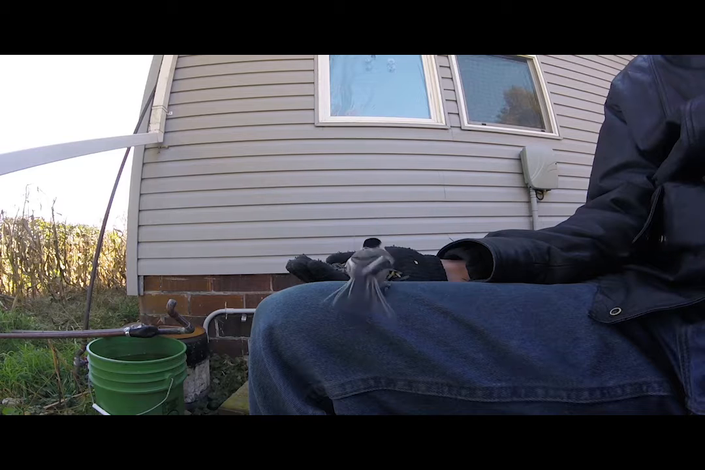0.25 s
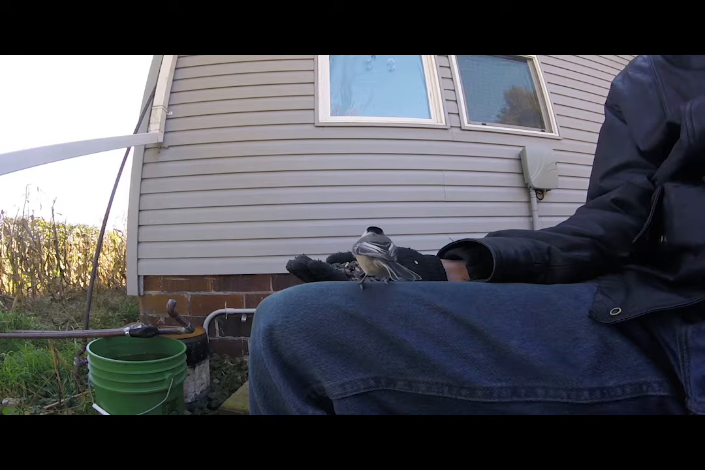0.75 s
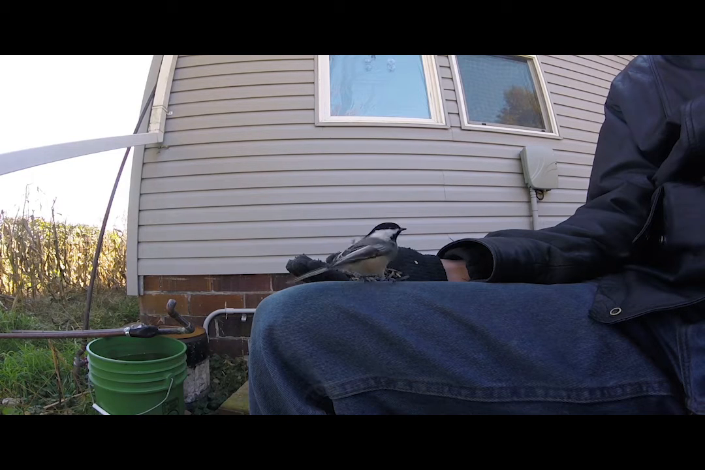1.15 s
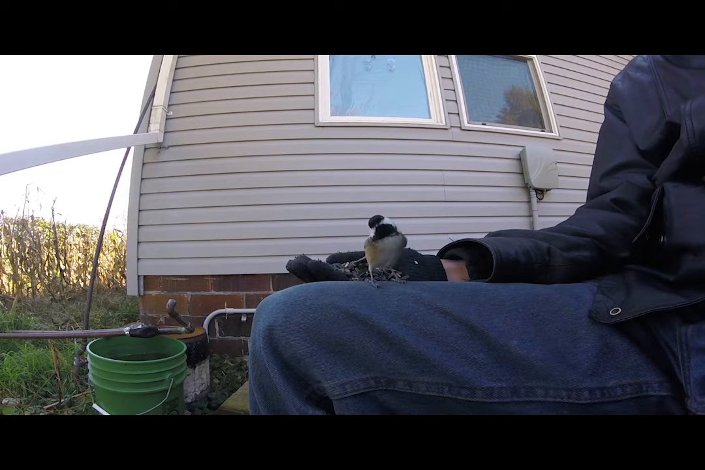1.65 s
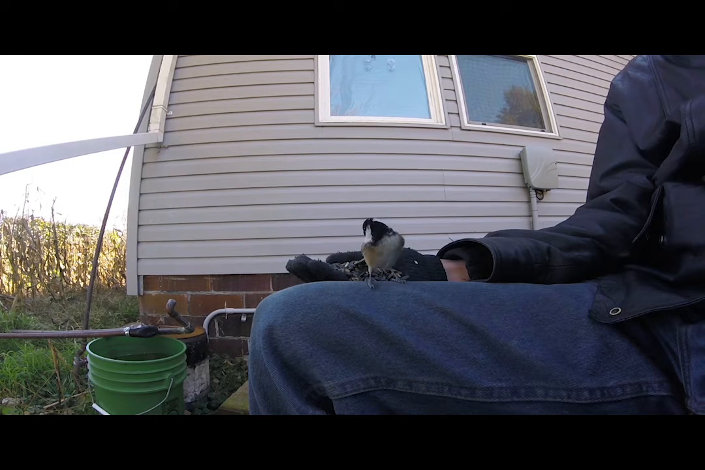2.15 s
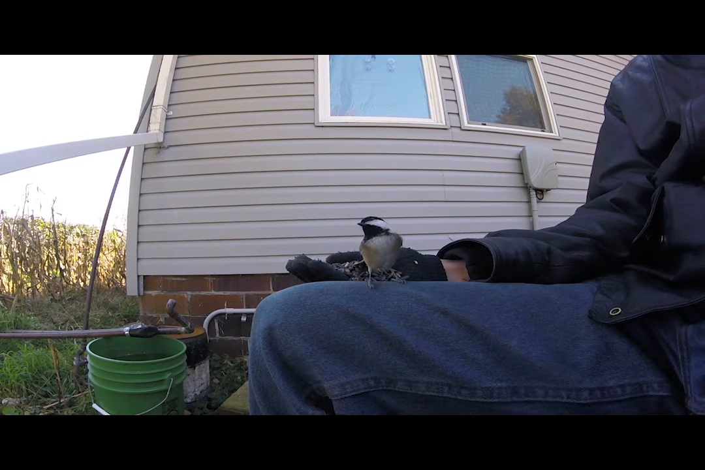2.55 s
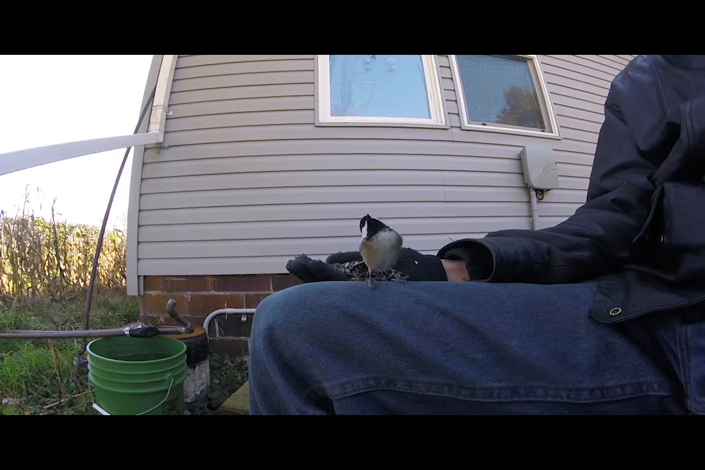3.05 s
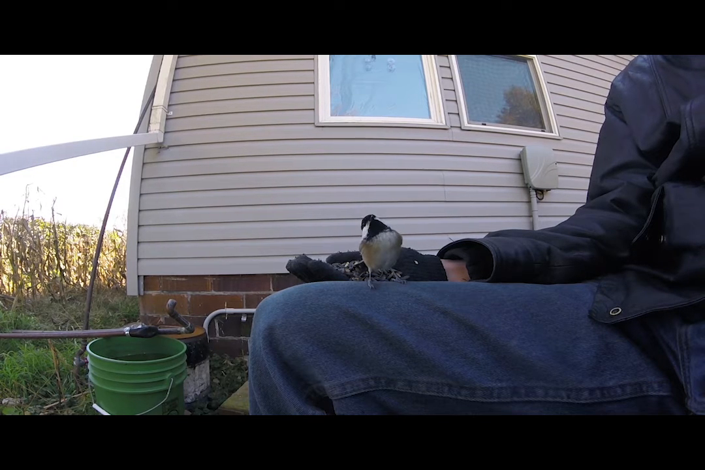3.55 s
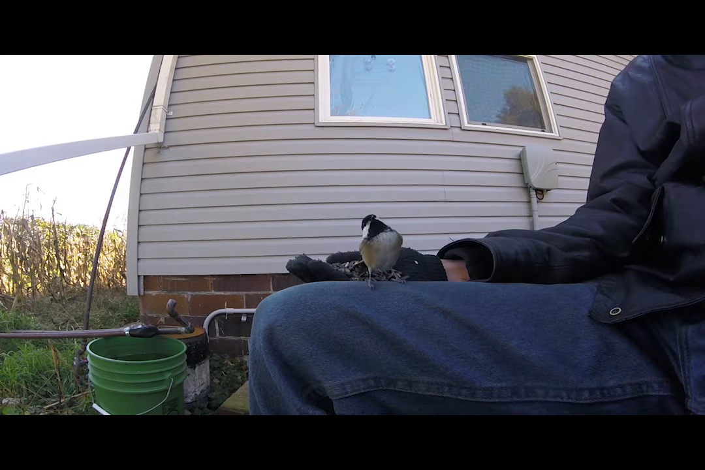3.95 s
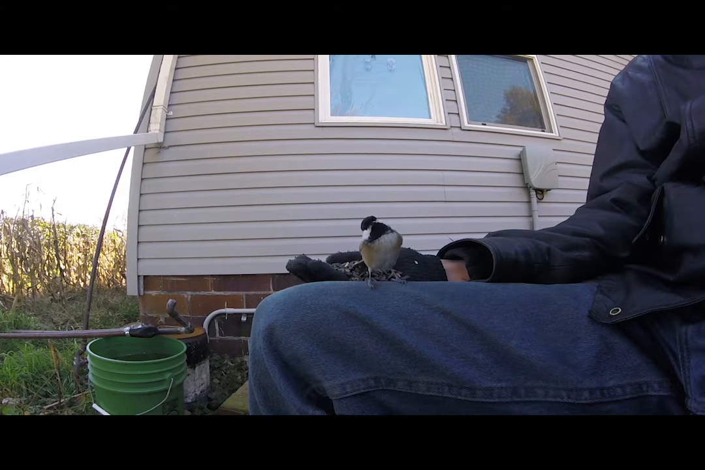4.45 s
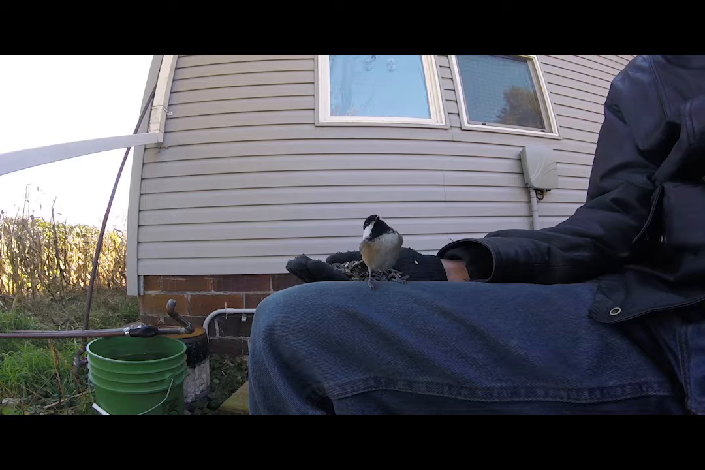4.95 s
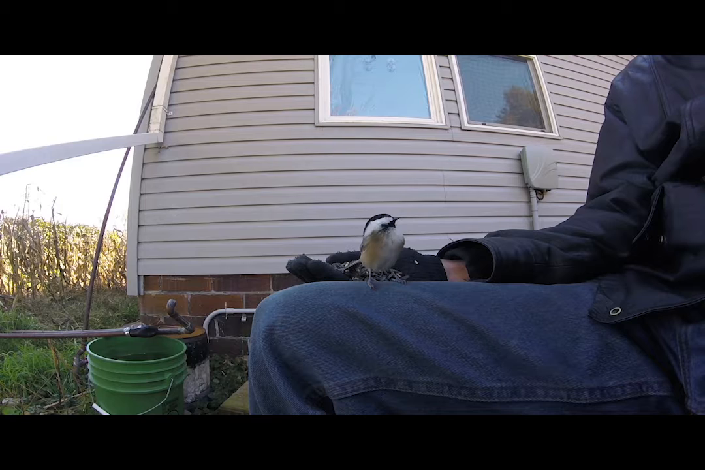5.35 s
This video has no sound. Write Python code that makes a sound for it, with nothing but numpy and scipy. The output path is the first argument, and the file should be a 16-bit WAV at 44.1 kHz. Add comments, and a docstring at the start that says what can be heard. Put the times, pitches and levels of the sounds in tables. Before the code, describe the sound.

In a quiet yard beside a house wall, wingbeats thud softly on the microphone as a bird lands on a glove. High chips and buzzes start a chickadee quarrel, with a string of falling squeals under a louder, quick trill. Runs of thin, high twitter notes follow to the end, joined by more squeals and a brief puff of air. A faint low rumble and hiss continue throughout.

```python
"""A yard beside a house wall, with a faint rumble, hiss and machine hum throughout.
First a bird flutters onto a gloved hand close to the microphone, its wings puffing air at it.
From about 1 s chickadees squabble: sharp chips, falling squeals, high buzzes, then a fast trill.
Thin twittering joins at 2.5 s and runs on through a second bout of squeals, one more puff of air
and, after 5 s, three far notes. Siding, ground and twigs scatter the calls."""
import sys
import numpy as np
from scipy import signal
from scipy.fft import rfft, irfft, next_fast_len
from scipy.io import wavfile
from scipy.ndimage import uniform_filter1d, map_coordinates

SR = 44100
rng = np.random.default_rng(int(sys.argv[2]) if len(sys.argv) > 2 else 0)


def transcribe(signal):
    """Save signal, clipped to [-1, 1], as a 16-bit WAV file at the path in sys.argv[1]."""
    frames = np.atleast_2d(signal).T
    limited = np.clip(frames, -1, 1)
    pcm = np.round(limited * 32767).astype(np.int16)
    wavfile.write(sys.argv[1], SR, pcm)


N = 247401


def amp(db):
    """Decibels to gain."""
    return 10 ** (np.asarray(db) / 20)


def at(curve, s):
    """The values of a curve's columns at a time."""
    times, *columns = np.transpose(curve)
    return [np.interp(s, times, column) for column in columns]


def add(track, s, sound):
    """Mix a sound into a track at a time."""
    i = round(s * SR)
    part = sound[max(-i, 0):max(N - i, 0)]
    track[max(i, 0):max(i, 0) + len(part)] += part


def wobble(rate, size):
    """A smooth random curve, rate knots a second."""
    knots = rng.standard_normal(int(size * rate / SR) + 4)
    return map_coordinates(knots, [np.arange(size) * rate / SR])


def filtered(x, response):
    """x shaped by a gain that is a function of frequency."""
    size = next_fast_len(N + SR // 2)
    return irfft(rfft(x, size) * response(np.fft.rfftfreq(size, 1 / SR)), size)[:N]


def noise(spectrum):
    """Noise of rms 1 coloured by (frequency_hz, density_db) points."""
    points_hz, db = np.transpose(spectrum)
    x = filtered(rng.standard_normal(N), lambda hz: amp(np.interp(np.log(hz + 1), np.log(points_hz), db)))
    return x / np.sqrt(np.mean(x ** 2) + 1e-20)


def gesture(shape, stretch=1, pitch=1, waver=0, flutter_db=0):
    """Phase and loudness of one syrinx movement given as (time, pitch, level_db) points."""
    times, pitches, db = np.transpose(shape)
    times = times * stretch
    t = np.arange(times[0], times[-1], 1 / SR)
    glide_hz = pitch * uniform_filter1d(np.interp(t, times, pitches), size=40)
    hz = glide_hz * (1 + waver * wobble(355, len(t)))
    loud = amp(np.interp(t, times, db) + flutter_db * wobble(297, len(t)))
    soft_ends = signal.windows.tukey(len(t), min(130 / len(t), 1))
    return 2 * np.pi * np.cumsum(hz) / SR, loud * soft_ends


def note(shape, stretch=1, pitch=1):
    """A pure whistled note that wavers a little."""
    phase, loud = gesture(shape, stretch, pitch, waver=0.0058, flutter_db=1.35)
    return loud * np.sin(phase)


def scattered(sound, delay_s, t60_s):
    """The sound returned by siding, ground and twigs, anew for each place of the bird."""
    t = np.arange(SR // 5) / SR
    tail = rng.standard_normal(len(t)) * amp(-60 * t / t60_s)
    wet = signal.fftconvolve(sound, tail)
    return np.pad(wet * np.linalg.norm(sound) / np.linalg.norm(wet), (round(delay_s * SR), 0))


def with_scatter(sound, wet_db, delay_s, t60_s):
    """A call reaches the microphone directly, then its scatter follows."""
    wet = amp(wet_db) * scattered(sound, delay_s, t60_s)
    return wet + np.pad(sound, (0, len(wet) - len(sound)))


def glanced(sound, echo_db, spread_s, count=4):
    """Close reflections interfere with a gliding pitch and break it into beads."""
    paths = np.zeros(SR // 40)
    paths[0] = 1
    lags_s = rng.uniform(.0006, spread_s, count)
    paths[(lags_s * SR).astype(int)] += amp(echo_db) * rng.choice([-1, 1], count)
    return signal.fftconvolve(sound, paths / np.linalg.norm(paths))


# Far rumble and a steady hiss with a narrow peak near 6.5 kHz: frequency_hz, relative_density_db
RUMBLE_SPECTRUM = [(12, -41.5), (20, -2.5), (38, 1.5), (54, 2.5), (86, -9), (118, -9.5), (168, -17.5),
                   (416, -24), (870, -26), (1100, -29), (1430, -53), (2420, -120)]
HISS_SPECTRUM = [(710, -39), (1200, -2), (1510, -4.5), (1710, -5.5), (2090, -5.5), (3450, -10),
                 (3840, -16.5), (4830, -12.5), (5770, -13), (6250, -6.5), (6530, 1.5), (6850, -3.5),
                 (7500, -7), (12800, -19.5), (14600, -32)]
# Tones of a distant machine: pitch_hz, level_db
MACHINE_TONES = [(734, -82), (856, -80), (978.4, -81.5)]


def outdoors():
    """The steady bed: distant rumble, a hiss with a narrow peak near 6.5 kHz and a faint machine hum."""
    t = np.arange(N) / SR
    rumble = amp(-52 + 0.52 * wobble(3.78, N)) * noise(RUMBLE_SPECTRUM)
    hiss = amp(-64 + 1.18 * wobble(18, N)) * noise(HISS_SPECTRUM)
    hum = sum(amp(db) * np.sqrt(2) * np.sin(2 * np.pi * hz * t + 0.32 * wobble(3.98, N))
              for hz, db in MACHINE_TONES)
    return rumble + hiss + hum


# Puffs of air right on the microphone: start_s, length_s, pitch_hz, level_db
WING_PUFFS = [(0, 0.047, 56, -28), (0.057, 0.084, 31.3, -32.5), (0.182, 0.069, 30, -27),
              (0.224, 0.098, 66, -37.5), (0.316, 0.052, 87, -29.5), (0.358, 0.049, 29.3, -36.5),
              (4.345, 0.036, 160, -48), (4.349, 0.09, 49.5, -36)]


def wings():
    """Wingbeats push short swirls of air at the microphone: low thuds with noisy eddies."""
    thuds, gust = np.zeros(N), np.zeros(N)
    for s, length_s, hz, db in WING_PUFFS:
        size = int(length_s * SR)
        phase = 2 * np.pi * np.cumsum(hz * (1 + 0.25 * wobble(98, size))) / SR
        push = amp(db) * signal.windows.tukey(size, .5)
        add(thuds, s, push * np.sin(phase))
        add(gust, s, push)
    eddies = noise([(30, 1.5), (110, -1), (200, -9.5), (330, -21), (700, -34.5), (2000, -73)])
    return thuds + amp(-12.5) * gust * eddies


# Touches on the glove, close in: start_s, length_s, level_db
GLOVE_TOUCHES = [(0, 0.0083, -52.5), (0.083, 0.035, -63.5), (0.182, 0.052, -59.5), (0.272, 0.0031, -52),
                 (0.277, 0.0082, -53.5), (0.833, 0.059, -59.5), (1.02, 0.029, -64)]
# Colour of the rustle: frequency_hz, relative_density_db
FEATHER_SPECTRUM = [(200, -4), (1000, 2.5), (2000, -0.5), (4000, -9.5), (6000, 0.5), (9000, -13),
                    (14000, -32)]


def rustles():
    """Feathers and claws brush the glove beside the microphone."""
    touch = np.zeros(N)
    for s, length_s, db in GLOVE_TOUCHES:
        add(touch, s, amp(db) * signal.windows.tukey(int(length_s * SR), .5))
    return touch * noise(FEATHER_SPECTRUM) * amp(wobble(400, N))


# Chips in the yard: start_s, pitch_hz, level_db
CHIP_CALLS = [(0.92, 8520, -34), (.992, 8050, -38), (3.148, 8900, -32.5)]
# The fall of one chip: time_s, pitch_ratio, relative_db
CHIP_FALL = [(0, 0.96, -13), (.002, .84, -10.5), (.0035, 0.72, 4), (.005, 0.427, -15.5), (.007, .33, -14),
             (.011, 0.13, -48)]


def chips():
    """Lone sharp chips, each a whistle in one fast fall."""
    out = np.zeros(N)
    for s, hz, db in CHIP_CALLS:
        chip = amp(db) * note(CHIP_FALL, pitch=hz)
        add(out, s, with_scatter(chip, wet_db=-3, delay_s=0.001072, t60_s=0.072))
    return out


# Two bouts of squeals: start_s, held_pitch_hz, level_db
SQUEAL_CALLS = [(1.059, 1843, -55), (1.212, 1934, -52), (1.3, 1884, -54.5), (1.362, 1968, -50.5),
                (1.457, 1880, -51), (1.61, 1877, -50), (1.769, 1940, -50), (1.928, 1926, -52),
                (2.085, 1960, -50), (2.241, 1997, -50), (2.949, 1750, -55), (3.227, 1923, -53),
                (3.393, 1950, -52), (3.562, 1970, -50.5), (3.723, 2010, -51.5), (3.883, 2010, -51),
                (4.04, 2044, -48.5), (4.209, 2020, -50.5)]
# Through each bout the squeals sag further, grow duller and lose their fundamental as they end:
# time_s, sag_ratio, final_fundamental_db, overtones_db
SQUEAL_DRIFT = [(1, .965, -0.5, -0.5), (2.3, 0.89, -7, -6), (2.95, 1.0, -7.5, -.5),
                (4.2, .965, -11.5, -2.5)]
# The opening plunge: time_s, pitch_hz, relative_db
SQUEAL_PLUNGE = [(-.002, 7007, -10.5), (.0007, 6080, 6.5), (.0025, 4447, -6.5), (.0043, 2862, -4)]
# The note it settles on: time_s, pitch_ratio, sag_share, relative_db
SQUEAL_HOLD = [(.007, 1.17, 0.057, 2), (.014, 1.045, 0, 1.5), (.026, 1, 0.024, -2), (.058, 1, 1, -7),
               (.068, .94, 1, -3), (.078, .75, 1, -6), (.094, .65, 0.91, -8)]
# Its overtones: pitch_multiple, relative_db
SQUEAL_OVERTONES = [(2, -1), (3, -2), (4, -3), (5, -10)]


def squeals(plunge_boost_db=11, cracks_db=4.5, overtone_spread_db=1.5):
    """The pitch plunges, holds near 2 kHz with overtones, then cracks and sags; a far wall answers."""
    out = np.zeros(N)
    for s, hz, db in SQUEAL_CALLS:
        sag, end_db, bright_db = at(SQUEAL_DRIFT, s)
        shape = [(when, pitch, db + plunge_boost_db + level) for when, pitch, level in SQUEAL_PLUNGE]
        shape += [(when, hz * ratio * sag ** share, db + level)
                  for when, ratio, share, level in SQUEAL_HOLD]
        phase, loud = gesture(shape, waver=0.0048, flutter_db=1.6)
        t = np.arange(len(phase)) / SR
        ending = np.interp(t, [.05, .08], [0, 1])
        voice = np.sin(phase) * amp(end_db * ending)
        # overtones grow once the pitch has settled and fade in the sag
        openness = np.interp(t, [.01, .03, .07, .09], [0.22, 0.61, 1.0, 0.72])
        for multiple, level in SQUEAL_OVERTONES:
            overtone_db = bright_db + level + overtone_spread_db * rng.standard_normal()
            voice += amp(overtone_db) * np.sin(multiple * phase) * openness
        voice *= amp(cracks_db * ending * wobble(697.5, len(t)))
        squeal = glanced(loud * voice, echo_db=-16, spread_s=.004)
        add(out, s, with_scatter(squeal, wet_db=-6.5, delay_s=.002, t60_s=0.09))
    wall_echo = amp(-15) * filtered(out, lambda hz: 1 / (1 + (hz / 2700) ** 4))
    add(out, .078, wall_echo)
    return out


# High buzzes, direct and off the surroundings: start_s, length_s, pitch_hz, direct_db, scatter_db
BUZZ_CALLS = [(1.109, 0.095, 7340, -42, -44.5), (2.115, 0.086, 8300, -71, -54),
              (2.48, 0.088, 8300, -57, -55), (2.995, 0.09, 8180, -55, -50), (3.497, 0.12, 7860, -56, -51),
              (4.663, 0.082, 8390, -58, -61)]


def buzzes(swing_hz=720, rate_hz=83, roam_hz=260):
    """A high whistle swung unevenly up and down, loudest at the bottom of each swing."""
    out = np.zeros(N)
    for s, length_s, hz, db, wet_db in BUZZ_CALLS:
        t = np.arange(int(length_s * SR)) / SR
        swing = -np.cos(2 * np.pi * rate_hz * t)
        swell = np.interp(t / length_s, [0, .25, .45, 1], [0.25, 0.83, 0.41, 0.43])
        pitch_hz = hz + swing_hz * swing + roam_hz * wobble(119.5, len(t))
        tone = swell * np.sin(2 * np.pi * np.cumsum(pitch_hz) / SR)
        add(out, s, amp(db) * glanced(tone * amp(-4 * swing), echo_db=-22, spread_s=0.018))
        # the surroundings mostly return the middle of the swing
        add(out, s, amp(wet_db) * scattered(tone * amp(-7 * swing ** 2), delay_s=.004, t60_s=.2))
    return out


# The trill swells quickly, holds and tires: time_s, whistle_db, low_note_db (before its trim)
TRILL_SWELL = [(1.525, -36, -32), (1.59, -28, -28), (1.72, -27, -26.5), (1.98, -27.5, -30.5),
               (2.26, -26.5, -30), (2.41, -28.5, -26.5), (2.55, -29.5, -32), (2.706, -33.5, -34),
               (2.797, -41.5, -35.5)]
# Its two notes draw together: time_s, whistle_hz, low_note_hz
TRILL_TUNING = [(1.525, 5010, 4510), (1.6, 5145, 4580), (2.0, 5070, 4510), (2.12, 5090, 4660),
                (2.41, 5074, 4690), (2.55, 5010, 4670), (2.706, 5050, 4570), (2.797, 4790, 4620)]
# The whistle of a syllable: from_middle_s, pitch_ratio, relative_db
TRILL_WHISTLE = [(-.013, 0.99, -50), (-.009, 1.047, -9.5), (-.004, 1.002, -1), (0, 1, 1.5),
                 (.004, .985, 0.5), (.007, 0.986, -6.5), (.009, 1, -20)]
# The rise into the low note: from_flick_s, pitch_ratio, relative_db
TRILL_LOW_NOTE = [(-.031, 0.685, -24), (-.027, .75, -24), (-.022, .88, -29), (-.016, 1, -11),
                  (-.009, .995, -2.5), (-.003, 1.015, -1.5), (0, 1.056, -8.5), (.002, 1.15, -18)]
# The closing flick: from_middle_s, pitch_hz, relative_db
TRILL_FLICK = [(-.004, 6900, -26), (-.001, 6340, -15), (.0005, 6245, -3), (.002, 5800, -13),
               (.004, 5300, -17)]


def trill(count=19, first_gap_s=.0629, slowing_s=.00081, flick_after_s=.0355, low_trim_db=-1.5):
    """Slowing syllables: a sinking whistle, a low note, a flick from the other side of the syrinx."""
    out = np.zeros(N)
    gaps_s = first_gap_s + slowing_s * np.arange(count - 1)
    gaps_s[-1] += .013  # the last syllable comes a little late
    for s in 1.526 + np.append(0, np.cumsum(gaps_s)):
        whistle_db, low_db = at(TRILL_SWELL, s)
        whistle_hz, low_hz = at(TRILL_TUNING, s)
        low_db += low_trim_db
        flick_db = low_db + 1.5 * rng.standard_normal()
        whistle = amp(whistle_db) * note(TRILL_WHISTLE, pitch=whistle_hz)
        louder, higher = rng.standard_normal(2)
        low = amp(low_db + 0.5 * louder) * note(TRILL_LOW_NOTE, pitch=low_hz * (1 + 0.0097 * higher))
        flick = amp(flick_db) * glanced(note(TRILL_FLICK), echo_db=-17, spread_s=0.0041)
        flick_s = s + flick_after_s
        add(out, s + TRILL_WHISTLE[0][0], with_scatter(whistle, wet_db=-13.5, delay_s=.0064, t60_s=.051))
        add(out, flick_s + TRILL_LOW_NOTE[0][0], with_scatter(low, wet_db=-7, delay_s=.0078, t60_s=.06))
        add(out, flick_s + TRILL_FLICK[0][0], with_scatter(flick, wet_db=-8.5, delay_s=.0023, t60_s=.15))
    return out


# The ticks are clearest near 5 s: time_s, level_db
TICK_LEVEL = [(2.5, -63.5), (4.2, -61), (4.7, -60.5), (5.08, -56.5), (5.6, -67)]


def ticks(note_times, lead_s=.008):
    """A faint, lower tick of noise leads each twitter note."""
    pulses = np.zeros(N)
    for s in note_times:
        db = at(TICK_LEVEL, s)[0] + 2 * rng.standard_normal()
        add(pulses, s - lead_s, amp(db) * np.hanning(SR // 150))
    spectrum = [(1200, -39), (2200, -2.5), (3100, -2.5), (4200, -20), (5200, -3), (7500, -27), (11000, -60)]
    return pulses * noise(spectrum)


# Runs of evenly spaced twitter notes: first_s, last_s, note_count
NOTE_RUNS = [(2.474, 2.946, 12), (3.002, 3.8025, 18), (3.846, 4.277, 10), (4.328, 4.845, 11),
             (4.936, 4.991, 2), (5.091, 5.091, 1), (5.324, 5.586, 6)]
# One note, a V in pitch: length_share, pitch_ratio, relative_db
NOTE_VEE = [(-.1, 1.43, -22), (.03, 1.36, -15), (.15, 1.17, -9), (.27, 1.03, -5.5), (.42, .995, 1),
            (.6, 1.02, -3), (.78, 1.06, -13.5), (1, 1.2, -16), (1.1, 1.5, -44)]
# Stressed notes: time_s, extra_db
NOTE_ACCENTS = [(2.732, 9), (3.66, 7), (3.754, 12.5), (3.801, 8), (4.132, 4), (4.38, 0), (4.483, 5.5)]
# The twitter straight to the microphone, and back from the surroundings: time_s, level_db
DIRECT_LEVEL = [(2.47, -47), (2.92, -47), (3.05, -41.5), (3.3, -44), (3.87, -44.5), (4.02, -37.5),
                (4.27, -41), (4.33, -35.5), (4.44, -35), (4.535, -40.5), (4.84, -43), (4.94, -37),
                (5.09, -38.5), (5.324, -41.5), (5.42, -41), (5.6, -40.5)]
SCATTER_LEVEL = [(2.5, -53.5), (2.78, -46.5), (3.2, -44.5), (3.6, -47), (3.9, -44.5), (4.2, -40.5),
                 (4.3, -52), (4.75, -45), (5.05, -47), (5.6, -49.5)]
# The bottom of the V sinks in the lone notes and dips deeper in the last run: time_s, pitch_hz, dip_share
VEE_BOTTOM = [(2.5, 6430, .005), (3.2, 6300, .006), (3.9, 6340, .008), (4.45, 6190, 0.014),
              (4.7, 6380, 0.024), (5.091, 5970, 0.016), (5.324, 5760, 0.046), (5.38, 6300, .075),
              (5.6, 6450, 0.079)]


def twitter(first_length_s=.0175, growth_s_per_s=.0013):
    """Runs of thin V-shaped whistles, about twenty a second, slowly lengthening and no two alike."""
    out = np.zeros(N)
    share, ratio, level = np.transpose(NOTE_VEE)
    trough = np.exp(-((share - .33) / 0.18) ** 2)
    times = np.concatenate([np.linspace(first, last, round(count)) for first, last, count in NOTE_RUNS])
    stress = np.zeros(len(times))
    for s, extra_db in NOTE_ACCENTS:
        stress[np.argmin(abs(times - s))] = extra_db
    chance = rng.standard_normal((len(times), 3))
    for s, stress_db, (louder_db, higher, longer) in zip(times, stress, chance):
        direct_db = at(DIRECT_LEVEL, s)[0] + stress_db + louder_db
        wet_db = at(SCATTER_LEVEL, s)[0]
        hz, dip = at(VEE_BOTTOM, s)
        length_s = (first_length_s + growth_s_per_s * (s - times[0])) * np.exp(.1 * longer)
        shape = np.transpose([share, ratio - dip * trough, level])
        phase, loud = gesture(shape, length_s, hz * (1 + 0.0082 * higher), waver=0.0073, flutter_db=3)
        tone = np.sin(phase)
        start_s = s + share[0] * length_s
        add(out, start_s, amp(direct_db) * glanced(loud * tone, echo_db=-10.5, spread_s=.008))
        # the high arms of the V are beamed away from the microphone and come back stronger in the scatter
        add(out, start_s, amp(wet_db) * scattered(loud ** 0.48 * tone, delay_s=0.0037, t60_s=0.092))
    return out + ticks(times)


# Faint notes far from the microphone: start_s, pitch_hz, level_db
FAR_CALLS = [(5.16, 6520, -51.5), (5.222, 6600, -52), (5.3, 6680, -53)]


def far_notes():
    """Distant V-shaped notes that arrive only as scatter."""
    out = np.zeros(N)
    for s, hz, db in FAR_CALLS:
        call = note(NOTE_VEE, stretch=0.013, pitch=hz)
        add(out, s, amp(db) * scattered(call, delay_s=.001, t60_s=0.061))
    return out


def microphone_port(x, ring_hz=6510, width_hz=150, ring_db=-4, edge_hz=10000):
    """The camera's microphone port rings faintly in the treble and dulls what lies above."""
    def response(hz):
        damping = 1j * hz * width_hz
        ring = amp(ring_db) * damping / (ring_hz ** 2 - hz ** 2 + damping)
        return (1 + ring) / (1 + (hz / edge_hz) ** 20)
    return filtered(x, response)


def yard(x, t60_s=.3, build_s=.02):
    """Short reverberation of the open yard."""
    t = np.arange(SR // 2) / SR
    tail = rng.standard_normal(len(t)) * amp(-60 * t / t60_s) * (1 - np.exp(-t / build_s))
    return signal.fftconvolve(x, tail / np.linalg.norm(tail))[:N]


def scene():
    """One microphone by the house wall: wings and glove close in, calls around, the outdoors behind."""
    calls = microphone_port(chips() + squeals() + buzzes() + trill() + twitter() + far_notes())
    reverberation = amp(-24) * yard(calls)
    return (outdoors() + wings() + rustles() + calls + reverberation)[None]


def record(dry):
    """The camera keeps nothing above 14.4 kHz."""
    return np.array([filtered(x, lambda hz: hz < 14400) for x in dry])


dry = scene()
out = record(dry)
transcribe(out)
```